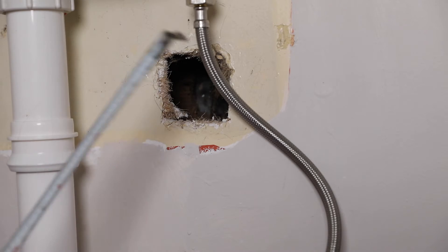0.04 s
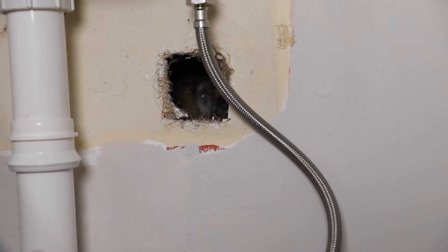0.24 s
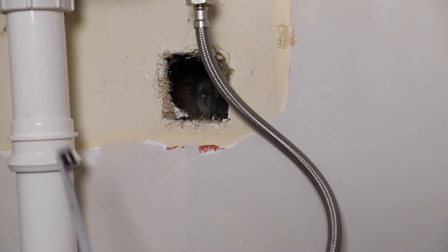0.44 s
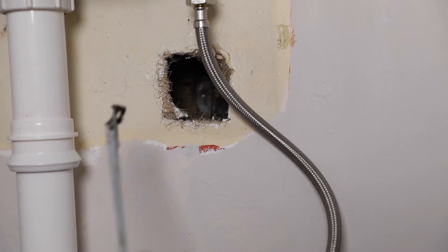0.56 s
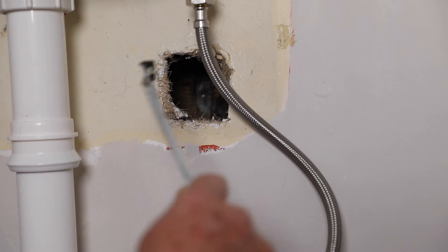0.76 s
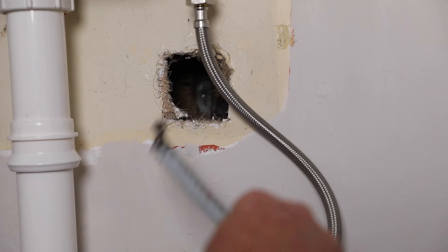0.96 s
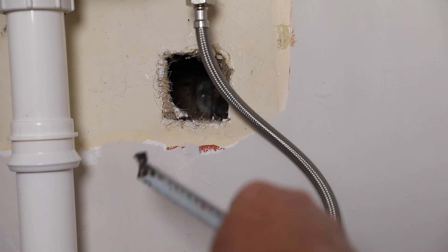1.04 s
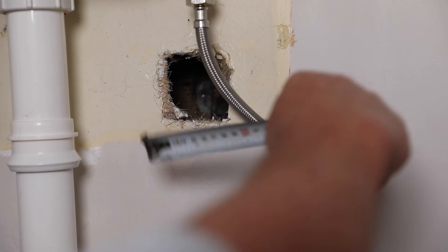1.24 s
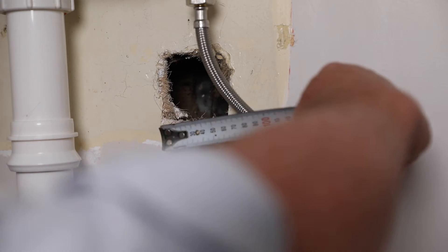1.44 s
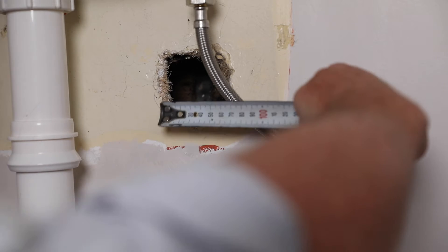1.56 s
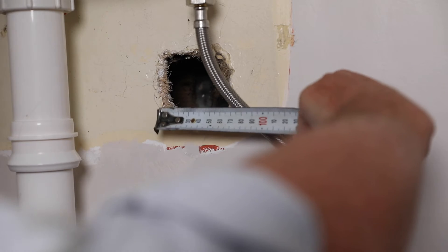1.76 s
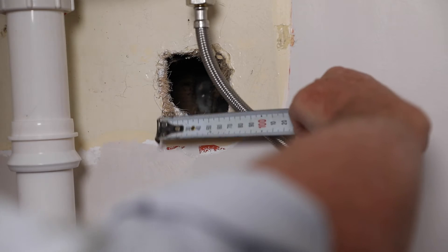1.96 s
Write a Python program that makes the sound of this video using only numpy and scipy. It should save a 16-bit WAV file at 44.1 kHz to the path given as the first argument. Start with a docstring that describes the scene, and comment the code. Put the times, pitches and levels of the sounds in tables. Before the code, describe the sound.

A steel tape measure blade scrapes softly, then rattles in bright metallic clicks, knocks sharply against a plaster wall and ends in small ticks; close microphone, small live room, quiet air and faint hum.

```python
"""Thin steel scrapes first, over quiet room noise and a faint mains hum; then clicks and a soft, regular low thump.
A steel tape measure is drawn back from a hole in a plaster wall, pulled out and laid against the wall,
close by in a small room. Scrapes are bunches of tiny random slips, and clicks are short bursts of chatter.
Both set the blade ringing as a sum of fading tones. One hard blow adds low wall tones and higher steel tones.
Fading random reflections make the room, and shaped noise makes its air."""
import sys
import numpy as np
from scipy import signal
from scipy.fft import rfft, irfft
from scipy.io import wavfile
from scipy.ndimage import uniform_filter1d

SR = 44100
rng = np.random.default_rng(int(sys.argv[2]) if len(sys.argv) > 2 else 0)


def unload_audio(sound):
    """Save the sound as a 16-bit wav file, at the path given as the first command line argument."""
    columns = np.transpose(np.atleast_2d(sound))
    # keep every value between -1 and 1, then stretch to whole-number steps
    steps = np.round(np.clip(columns, -1, 1) * 32767)
    wavfile.write(sys.argv[1], SR, steps.astype(np.int16))


N = 88200  # samples: two seconds

# In the tables, t60 is the time a sound takes to fade by 60 dB.
# colour of the room noise: (frequency [Hz], relative level per Hz [dB])
AIR_COLOUR = [(15, 5), (35, -17), (80, 0.5), (160, -4.5), (350, -6), (800, -11), (2000, -13), (5000, -18.5),
              (10000, -23), (16000, -24.5)]
# mains hum: (frequency [Hz], rms level [dB])
MAINS_HUM = [(50, -62.5)]
AIR_DB = -48  # rms level

# the blade sliding and rattling: (start [s], length [s], level before fade [dB], change by the end [dB],
# bass [dB], treble [dB], favoured frequency [Hz], its boost or cut [dB])
SCRAPES = [(0, 0.04, -33, -12, 12, -4, 925, 0.5), (0.032, 0.23, -46.5, -2.5, 6.5, -7, 616, 5.5),
           (0.187, 0.11, -40, -3.5, 2, -10.5, 550, 10.5), (0.301, 0.043, -31, -3.5, 0, -5, 520, 11.5),
           (0.357, 0.11, -40.5, -8.5, 3.5, 3, 233, 10), (0.4685, 0.036, -24, 0, 1, 3.5, 5600, 10),
           (0.506, 0.058, -25, -13, -2.5, -1, 5400, 0), (0.633, 0.08, -32, -1.5, -2, -1, 2140, 4.5),
           (0.738, 0.19, -34.5, -13.5, -23, -3, 2450, 10), (0.857, 0.14, -34.5, -13, -5.5, -6, 5030, 3),
           (0.942, 0.043, -28, -11, 2.5, 2, 4930, 7), (0.989, .1, -33.5, -0.5, -19, -3.5, 3220, 2),
           (1.089, 0.064, -38.5, -7.5, 6.5, 1, 3450, 2.5), (1.325, 0.071, -36.5, 4.5, 4, -11.5, 5030, -8),
           (1.367, 0.046, -27, -13, 6, -1, 5350, 2)]
SLIPS_PER_S, SLIP_SPREAD_DB, SCRAPE_EDGE_S = 4000, 2, 0.00036
CLUMP_S, CLUMP_DB = 0.003, 1.76  # smoothing time and typical swing of the crackle

# clicks of blade and hook: (time [s], level [dB], bass [dB], treble [dB], chatter t60 [s],
# favoured frequency [Hz], its boost or cut [dB])
CLICKS = [(.087, -33, 19, -3, 0.019, 406, 7), (0.1308, -29.5, 18, -21, 0.021, 1440, 11),
          (.193, -31.5, -6, -3, 0.053, 5000, 0), (0.2145, -26.5, 1, -13, 0.022, 454, 12.5),
          (0.235, -33, -2, -19, 0.054, 1600, 9), (0.305, -29, 8, 7, 0.022, 5170, -1),
          (.316, -28.5, 3, -6, 0.026, 2150, 8), (0.332, -29, -8, 4.5, 0.13, 5330, 11),
          (0.376, -30.5, 3, 3.5, 0.096, 3550, -5), (.438, -35.5, -4, -5, 0.031, 2320, 9),
          (0.4691, -21, -0.5, 8, 0.091, 1020, 11.5), (0.479, -19, -7, 4, 0.037, 5400, 4),
          (0.4988, -19.5, -8, 10, 0.022, 3520, 20), (0.5113, -15.5, -6, -14, 0.025, 3430, 6.5),
          (.516, -23.5, -3, 0, 0.034, 5370, 24), (.553, -30, -8, -5, 0.07, 3260, 4),
          (0.581, -25.5, 1, 6, 0.037, 2250, 11), (0.592, -27.5, 4, 4, 0.094, 4700, 4),
          (0.635, -23.5, 3.5, -1.5, 0.059, 5000, 8), (0.665, -26.5, 4, 8, 0.037, 2120, 9),
          (0.670, -22.5, -4, 6, 0.021, 4400, 6), (0.6826, -14.5, -14, 8, 0.033, 2160, 9),
          (0.7441, -21.5, 0.5, 4.5, 0.038, 2430, 19), (0.7721, -22, -7.5, 3, 0.058, 2400, 5),
          (0.813, -31.5, 0, 3, 0.04, 4840, 10), (.863, -19.5, 3, 0, 0.041, 4840, 3.5),
          (0.9508, -21.5, 1, -5.5, 0.018, 3080, 9), (0.961, -27, -10, -3, 0.051, 2410, 12),
          (0.997, -31.5, -10, -18, 0.047, 3530, -16), (1.102, -30.5, -24, -15, 0.023, 3220, -2),
          (1.1992, -40, 12, 7, 0.12, 3440, 12), (1.2202, -28, 3.5, -0.5, 0.05, 3800, 12),
          (1.317, -32, 11.5, 0, 0.034, 3500, 9), (1.3321, -20.5, -11, 5, 0.049, 5000, 10),
          (1.3617, -11, -8, 3, 0.023, 1050, -4), (1.374, -21, 8, 3, 0.028, 5350, 1),
          (1.4544, -16.5, 1, 9.5, 0.038, 5730, 8), (1.512, -21.5, 6, 11, 0.019, 5360, 10),
          (1.5541, -32, 13, 4, 0.026, 5000, 6), (1.6218, -28.5, 6.5, 0.5, 0.054, 2020, 1.5),
          (1.658, -27, 8.5, 6.5, 0.036, 6000, 9.5), (1.6972, -18, -1, 2, 0.014, 3220, 5.5),
          (1.725, -22.5, 0.5, 4.5, 0.014, 3460, 3.5), (1.794, -30, -0.5, -12, 0.018, 2050, 2.5),
          (1.8415, -31.5, 0, 4, 0.01, 3440, 9.5), (1.8779, -32.5, -5, -8, 0.024, 3050, 8),
          (1.902, -34.5, -28, -10, 0.0089, 3600, 5), (1.932, -40, 15, -3, 0.031, 3500, 16),
          (1.968, -28.5, -18, -2, 0.027, 3850, 13), (1.984, -34, -2, -4, 0.007, 3360, 11),
          (1.990, -28, -3, -9, 0.013, 3300, 9)]
CLICK_RISE_S, CLICK_LEVEL_SPAN_S = 0.00035, 0.0022  # the level is set over the opening span

# basic colour of a contact: (frequency [Hz], gain [dB])
CONTACT_COLOUR = [(60, -24.5), (200, -12.5), (600, -10.5), (1150, -9), (1550, -7.5), (2150, 0.5),
                  (2700, -1), (3400, 2), (4000, -0.5), (5500, -0.4), (7500, -7.5), (10500, -6), (13500, -9),
                  (16000, -11)]
BASS_EDGE_HZ, TREBLE_EDGE_HZ, PING_WIDTH_HZ = 1950, 6950, 355
# resonances of the end hook where it taps the wall: (frequency [Hz], boost [dB])
HOOK_RESONANCES = [(1490, 5), (1980, 2.5), (3400, 4.5), (4450, 5), (5350, 5.5), (6300, 5.5), (7400, 3)]
HOOK_WIDTH_HZ = 134

# ringing tones of the free blade: (frequency [Hz], relative level [dB], t60 [s])
FREE_BLADE = [(555, -13.5, 0.22), (948, -25, 0.2), (1744, -17, 0.28), (2147, -17.5, 0.19),
              (2382, -9.5, 0.15), (3550, -17, 0.13), (4650, -12, 0.15), (5325, -6, 0.068),
              (6897, -11, 0.31)]
# tones of the shorter blade length held against the wall: (frequency [Hz], relative level [dB], t60 [s])
HELD_BLADE = [(1386, -12.5, 0.5), (4270, -16, 0.2), (5300, -26, 0.08)]
BLADE_DB, HELD_FROM_S = -14.5, 1.35  # gain of all ringing; time from which the blade is held

# how the room fades: (frequency [Hz], t60 [s], relative level [dB])
ROOM = [(200, 0.64, 1.5), (1010, 0.44, 1.5), (2030, 0.42, -4.5), (4400, 0.31, -5), (7800, 0.27, -4),
        (15200, 0.29, -15.5)]
ROOM_ONSET_S, ROOM_CHANGE_S = 0.0026, 0.09  # onset ramp; time between reflection patterns

# peak levels of the thumps, one after another: (level [dB])
THUMP_LEVELS = [-36.5, -39, -40, -44, -38.5, -41.5, -41, -37.5, -35, -34]
THUMP_FIRST_S, THUMP_EVERY_S, THUMP_WIDTH_S = 0.091, 0.2042, 0.0022
# one duller handling bump: (time [s], level [dB], width [s])
HANDLING_BUMP = (1.977, -35, 0.004)

# the hook's hardest blow, low wall tones and higher steel tones: (frequency [Hz], starting level [dB], t60 [s])
KNOCK_TONES = [(450, -28.5, 0.027), (516, -27.5, 0.032), (720, -23.5, 0.024), (1526, -14.5, 0.024),
               (1980, -12, 0.009)]
KNOCK_S = 1.3617

CUTOFF_HZ = 15750


def amp(db):
    """Turns decibels into a gain."""
    return 10 ** (np.asarray(db) / 20)


def unit(x):
    """Scales a sound to an rms of one."""
    return x / np.sqrt(np.mean(x ** 2) + 1e-20)


def read(points, hz, axis=1):
    """Reads a table column between its points, along a log frequency scale."""
    table = np.array(points)
    return np.interp(np.log(hz + 1), np.log(table[:, 0] + 1), table[:, axis])


def add(mix, start, sound):
    """Mixes a sound in at a start time in seconds."""
    part = mix[max(round(start * SR), 0):][:len(sound)]
    part += sound[:len(part)]


def background():
    """Steady room noise is shaped random noise; the mains hum is a faint pure tone."""
    t, hz = np.arange(N) / SR, np.fft.rfftfreq(N, 1 / SR)
    spectrum = rfft(rng.standard_normal(N)) * amp(read(AIR_COLOUR, hz))
    air = unit(irfft(spectrum, N))
    hum = sum(amp(db) * unit(np.sin(2 * np.pi * (f * t + rng.random()))) for f, db in MAINS_HUM)
    return amp(AIR_DB) * air + hum


def contact(force, bass_db, treble_db, ping_hz, ping_db, on_wall=False, size=2048):
    """Where a force meets the steel sets its bass, treble and favoured tone; on the wall the hook adds its own."""
    hz = abs(np.fft.fftfreq(size, 1 / SR)) + 1
    bass = bass_db / (1 + (hz / BASS_EDGE_HZ) ** 4)
    treble = treble_db / (1 + (TREBLE_EDGE_HZ / hz) ** 6)
    ping = ping_db / (1 + ((hz - ping_hz) / PING_WIDTH_HZ) ** 2)
    db = read(CONTACT_COLOUR, hz) + bass + treble + ping
    if on_wall:
        db = db + sum(peak_db / (1 + ((hz - f) / HOOK_WIDTH_HZ) ** 2) for f, peak_db in HOOK_RESONANCES)
    # minimum phase: the filter responds as promptly as this colour allows
    log_response = np.conj(signal.hilbert(np.log(amp(db))))
    response = np.fft.ifft(np.exp(log_response)).real
    return signal.fftconvolve(force, response[:size // 2])


def scrapes():
    """The sliding blade catches in many tiny slips of uneven size, bunched into crackles."""
    out = np.zeros(N)
    for start, length, db, fade_db, bass_db, treble_db, ping_hz, ping_db in SCRAPES:
        t = np.arange(0, length, 1 / SR)
        chance, strength, sign = rng.random((3, SR // 4))[:, :len(t)]
        happens = chance < SLIPS_PER_S / SR
        size = amp(-SLIP_SPREAD_DB * np.log(strength + 0.037))
        edges = np.clip(np.minimum(t, length - t) / SCRAPE_EDGE_S, 0, 1)
        clumps = unit(uniform_filter1d(rng.standard_normal(SR // 4), int(CLUMP_S * SR)))[:len(t)]
        slips = happens * np.sign(sign - 0.5) * size * edges * amp(CLUMP_DB * clumps)
        rub = contact(slips, bass_db, treble_db, ping_hz, ping_db)
        progress = np.minimum(np.arange(len(rub)) / len(t), 1)
        add(out, start, amp(db + fade_db * progress) * rub / np.std(rub[:len(t)]))
    return out


def blade(drive):
    """Each contact leaves the steel ringing; contacts after the blade is held excite a different set of tones."""
    t, out = np.arange(SR // 2) / SR, np.zeros(N)
    held = np.arange(N) / SR >= HELD_FROM_S
    for modes, when in (FREE_BLADE, ~held), (HELD_BLADE, held):
        ring = np.zeros(len(t))
        for hz, db, t60 in modes:
            ring += amp(db) * unit(amp(-60 * t / t60) * np.sin(2 * np.pi * hz * t))
        out += signal.fftconvolve(drive * when, ring / np.sqrt(len(t)))[:N]
    return amp(BLADE_DB) * out


def room(x, count=4):
    """Walls return dense fading reflections; the sound drifts in turn through a few random patterns of them."""
    t, out = np.arange(SR // 2) / SR, np.zeros(N)
    place = np.arange(N) / SR / ROOM_CHANGE_S
    for k in range(count):
        onset = np.clip(t / ROOM_ONSET_S - 0.5, 0, 1)
        taps = rng.standard_normal(len(t)) * (rng.random(len(t)) < 0.2) * onset
        # each frequency band fades at its own rate
        hz, when, bands = signal.stft(unit(taps), SR, nperseg=256)
        t60 = read(ROOM, hz)[:, None]
        fade = amp(read(ROOM, hz, axis=2)[:, None] - 60 * when / t60)
        even_energy = np.sqrt(2 * np.log(1000) / (t60 * SR))  # long fades gain no extra energy
        tail = signal.istft(bands * fade * even_energy, SR, nperseg=256)[1]
        # smooth crossfade, going round the patterns in a circle
        distance = abs((place - k + count / 2) % count - count / 2)
        share = np.cos(np.pi / 2 * np.minimum(distance, 1))
        out += signal.fftconvolve(x * share, tail)[:N]
    return out


def clicks():
    """Each click is a brief, fading burst of steel chattering against its stop."""
    out, t = np.zeros(N), np.arange(SR // 16) / SR
    for start, db, bass_db, treble_db, t60, ping_hz, ping_db in CLICKS:
        chatter = rng.choice([-1., 1.], len(t))
        force = chatter * np.minimum(t / CLICK_RISE_S, 1) * amp(-60 * t / t60)
        click = contact(force, bass_db, treble_db, ping_hz, ping_db, start > HELD_FROM_S)
        add(out, start, amp(db) * click / np.std(click[:int(CLICK_LEVEL_SPAN_S * SR)]))
    return out


def thumps():
    """Each soft low thump is one dip and push of pressure; a single handling bump swings a little longer."""
    t = np.arange(N) / SR
    start, db, width = HANDLING_BUMP
    v = (t - start) / width
    out = amp(db) * np.cos(2 * v) * np.exp(-(v / 2) ** 2)
    for k, thump_db in enumerate(THUMP_LEVELS):
        u = (t - THUMP_FIRST_S - k * THUMP_EVERY_S) / THUMP_WIDTH_S
        out += amp(thump_db) * u * np.exp((1 - u ** 2) / 2)
    return out


def knock():
    """The hardest blow of the hook: low wall tones and higher steel tones, all quickly fading."""
    out, t = np.zeros(N), np.arange(SR // 8) / SR
    tones = sum(amp(db - 60 * t / t60) * np.cos(2 * np.pi * hz * t) for hz, db, t60 in KNOCK_TONES)
    add(out, KNOCK_S, tones)
    return out


def scene():
    """The tape measure in its room; contacts send different fine patterns straight to the ear and to the walls."""
    contacts = clicks() + scrapes()
    ringing = blade(contacts)
    direct = contacts + ringing + knock()
    toward_walls = clicks() + scrapes() + ringing  # same events with fresh random detail
    mono = direct + room(toward_walls) + background() + thumps()
    return np.array([mono, mono])


def record(dry):
    """A steep filter removes the treble above the cutoff."""
    lowpass = signal.firwin(511, CUTOFF_HZ, window=("kaiser", 8), fs=SR)
    return signal.oaconvolve(dry, lowpass[None], "same")


dry = scene()
out = record(dry)
unload_audio(out)
```